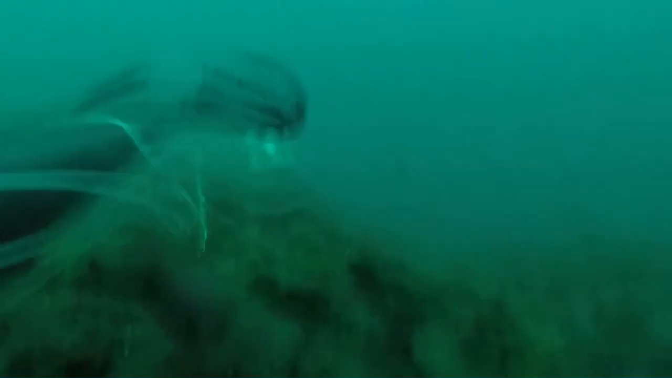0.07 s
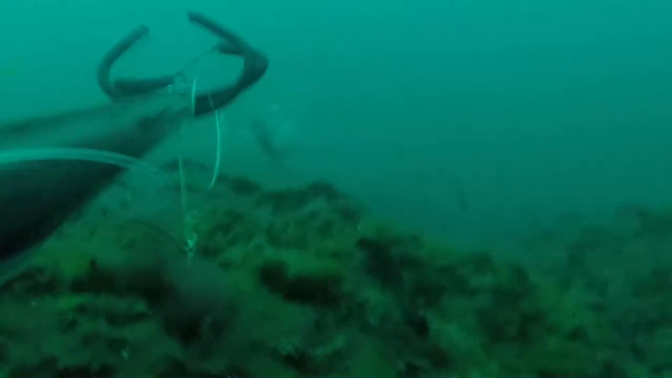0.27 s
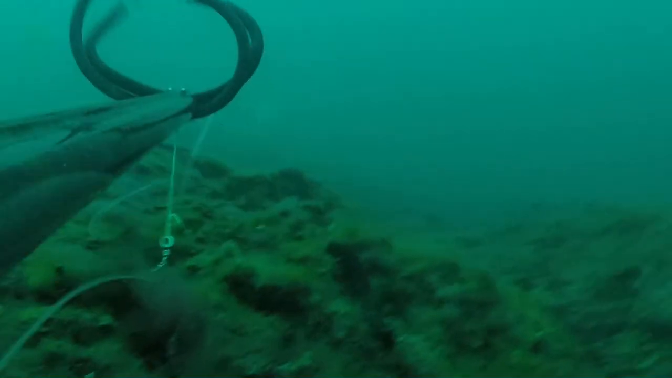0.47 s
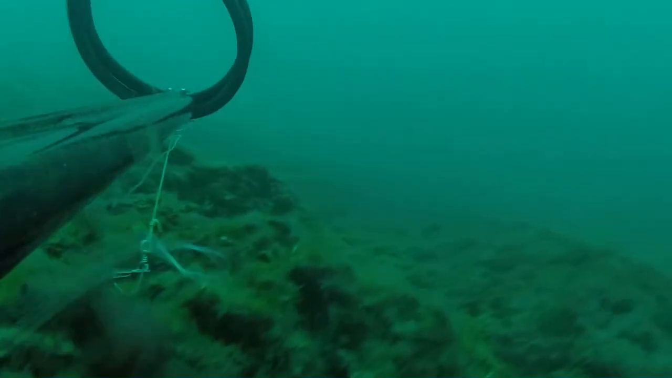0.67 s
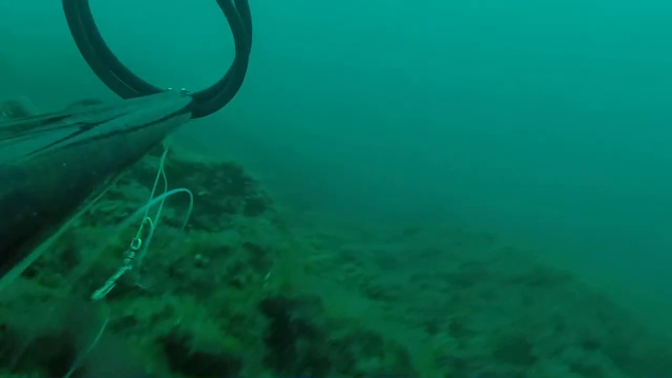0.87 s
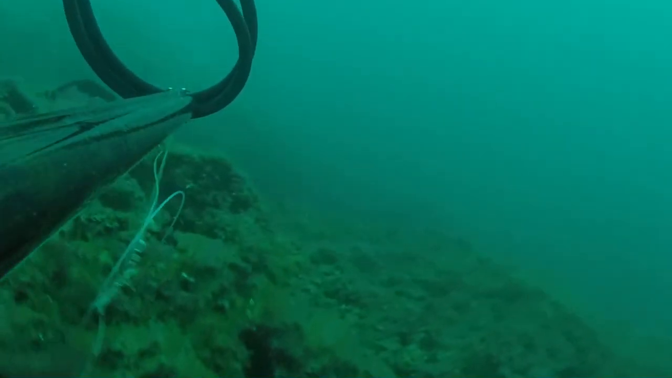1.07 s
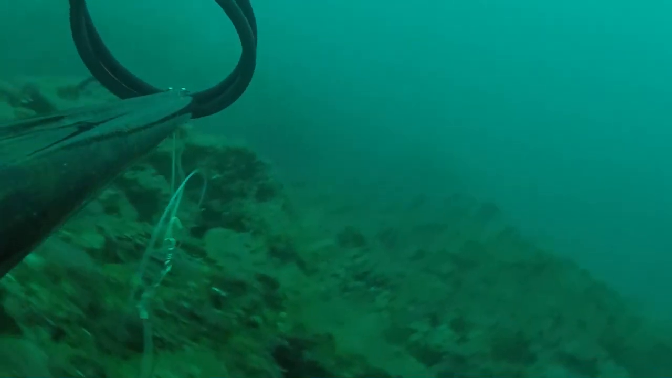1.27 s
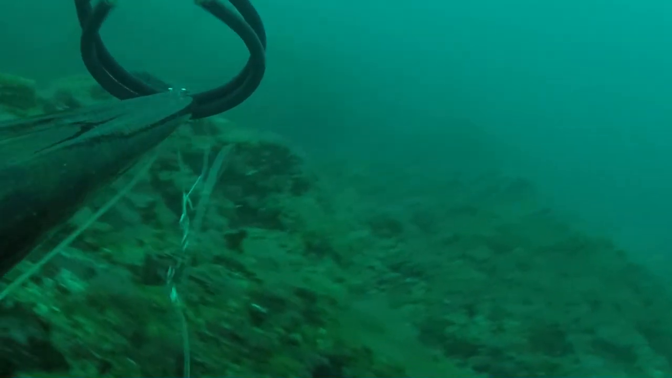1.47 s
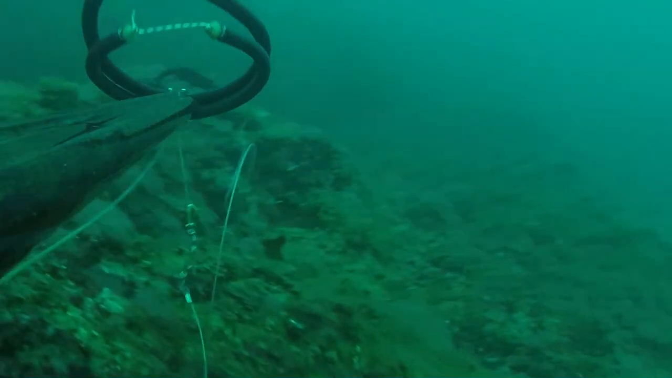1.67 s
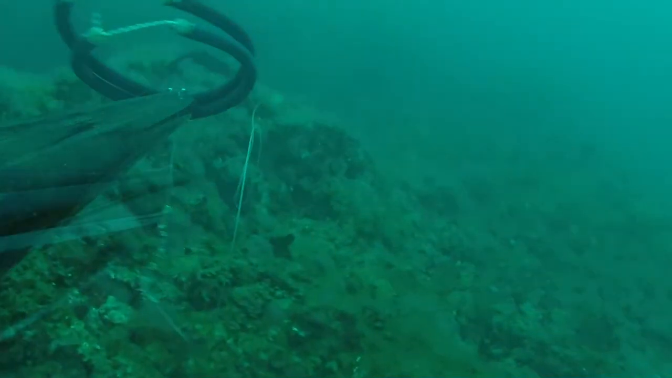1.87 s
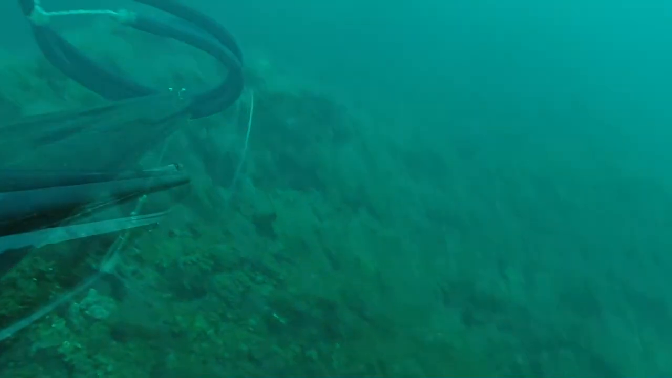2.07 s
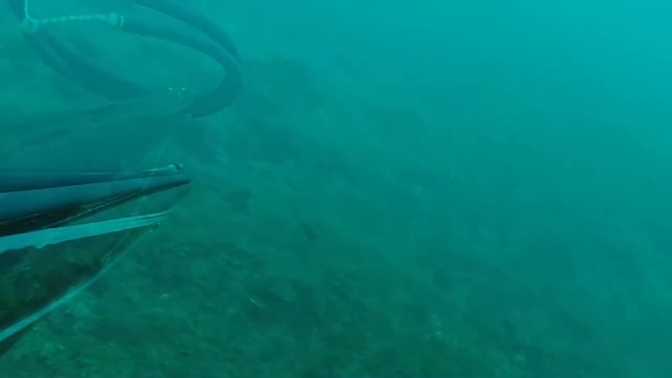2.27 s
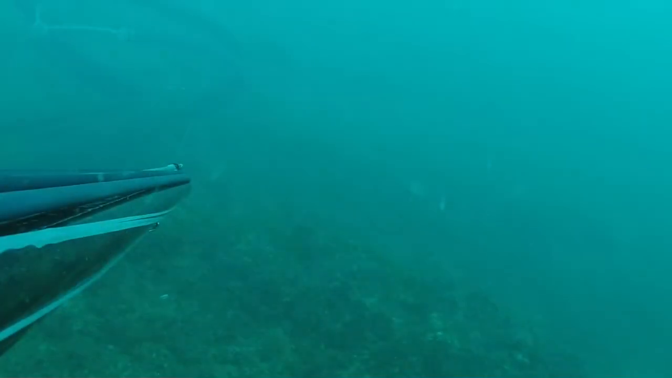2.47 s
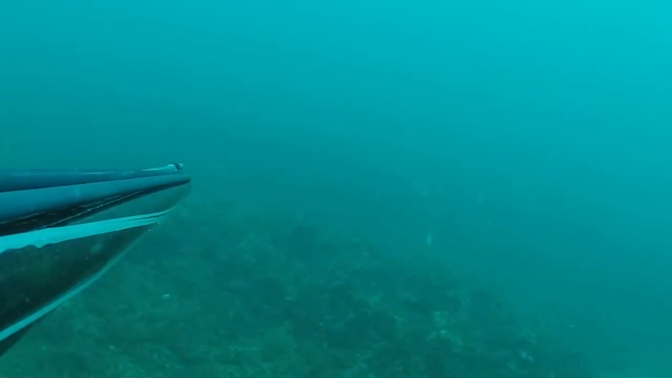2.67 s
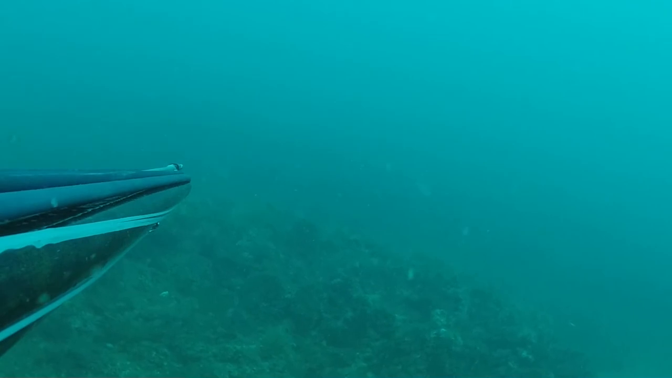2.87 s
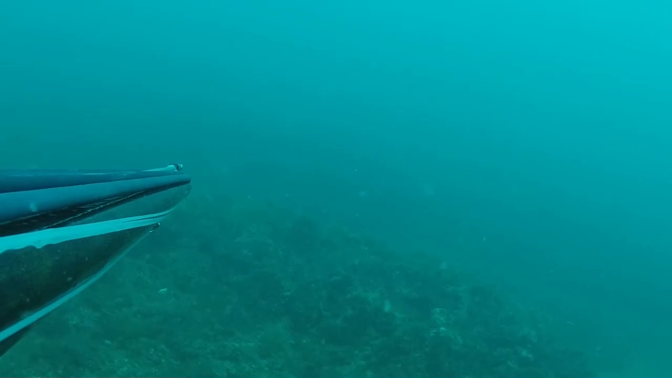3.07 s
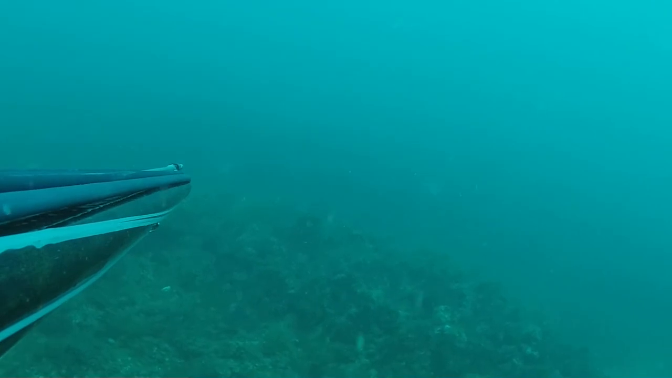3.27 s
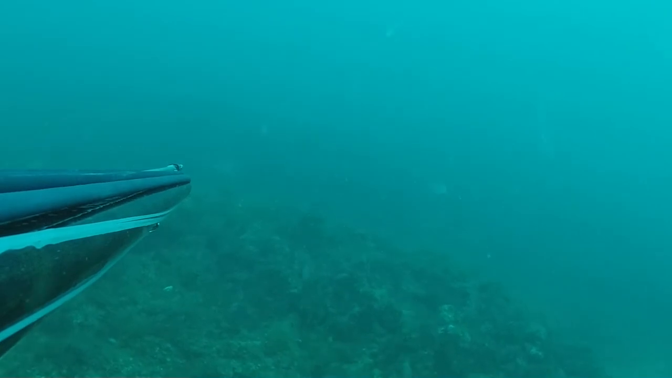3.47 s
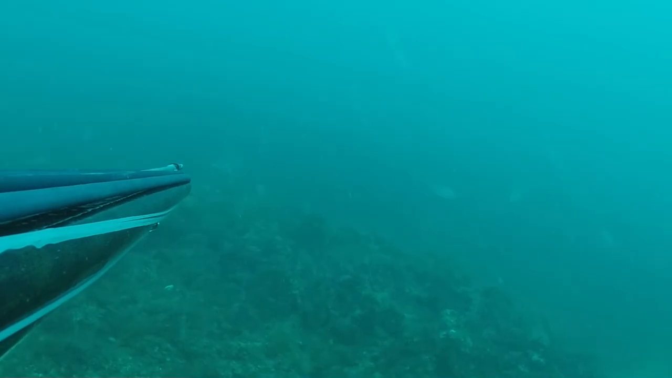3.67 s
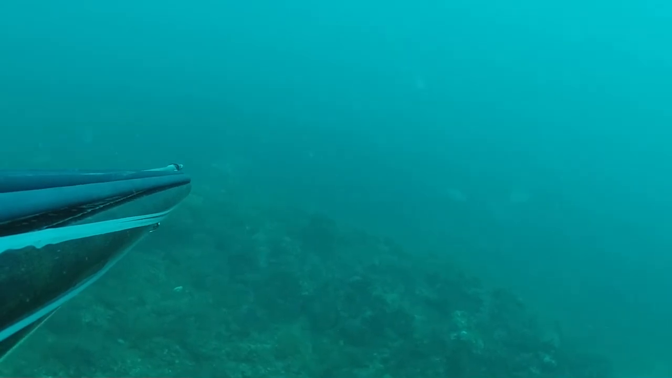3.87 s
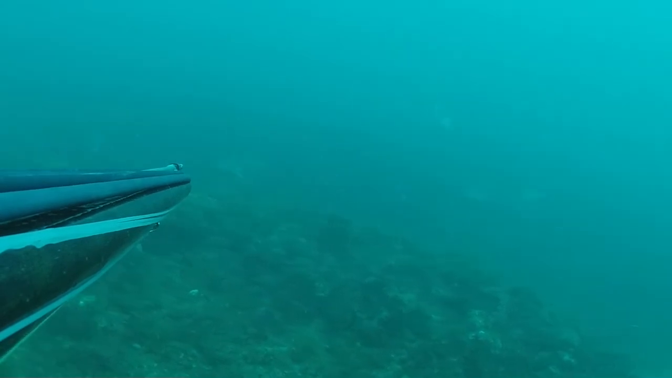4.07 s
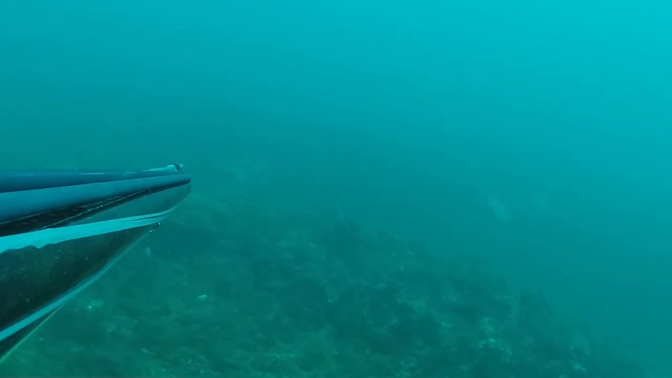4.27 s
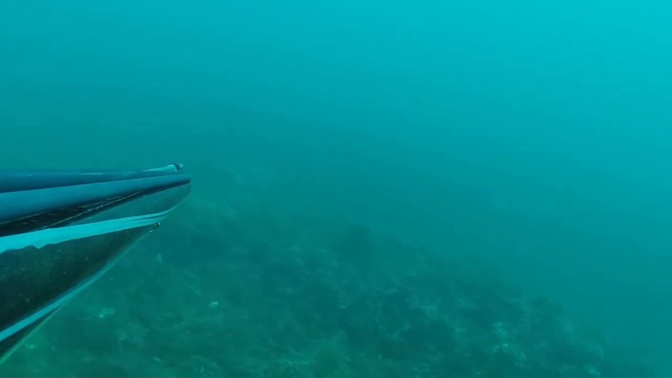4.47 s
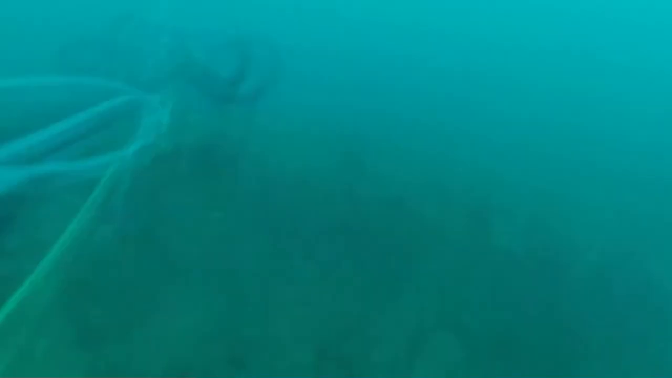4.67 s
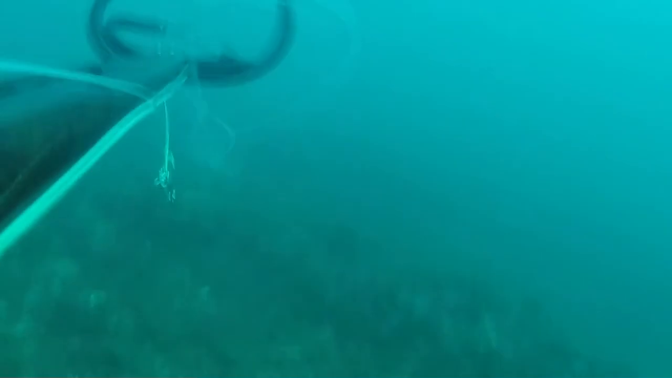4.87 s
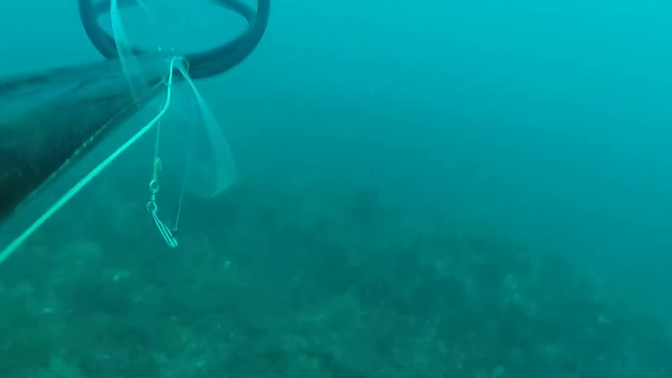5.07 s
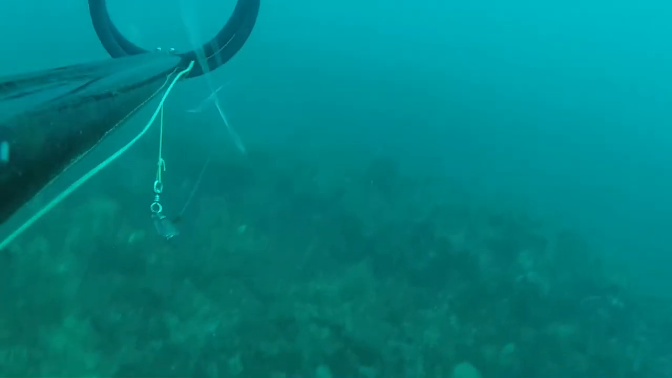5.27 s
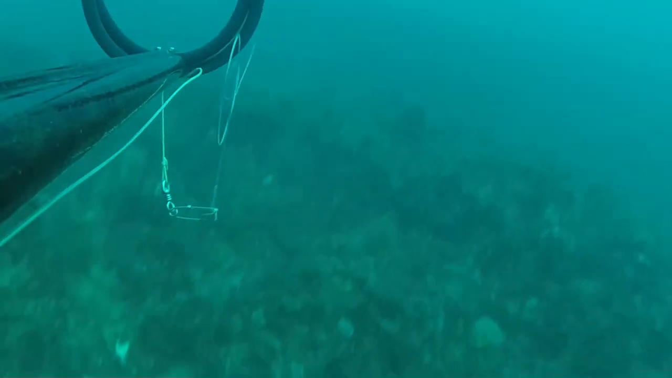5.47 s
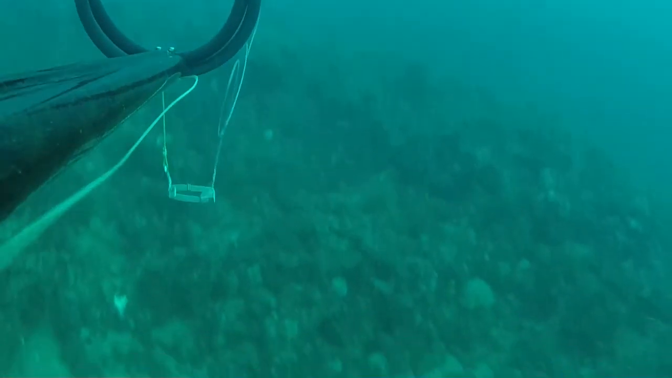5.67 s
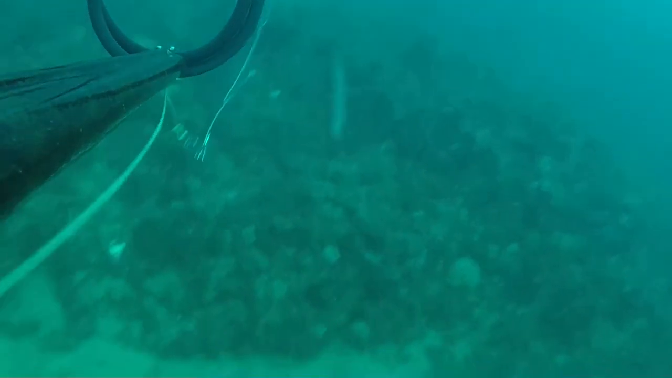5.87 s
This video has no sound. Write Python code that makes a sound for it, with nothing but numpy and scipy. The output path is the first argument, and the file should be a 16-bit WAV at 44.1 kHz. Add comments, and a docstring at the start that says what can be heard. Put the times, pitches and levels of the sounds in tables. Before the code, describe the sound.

Two abrupt, very loud mechanical cracks of a spear gun under water, each with a brief rattle, over a very quiet sea rumble and hiss.

```python
"""Spear gun fired twice under water

A camera in a sealed housing rides on a rubber-powered spear gun. Each shot is a rattle of noise scrapes
ringing barrel and housing modes, dull thumps and a slow sine shudder. Grainy friction makes line and rubbers
rustle; a rising tone is a squeaking bubble, fading sines are gulps and small bubbles. Far creatures snap in
bursts of bright noise, and filtered noise makes the sea rumble and hiss in the housing's resonances."""
import sys
import numpy as np
from scipy.fft import rfft, irfft, next_fast_len
from scipy.io import wavfile
from scipy.ndimage import map_coordinates

SR = 44100
rng = np.random.default_rng(int(sys.argv[2]) if len(sys.argv) > 2 else 0)


def int16_out(signal):
    """Quantize to a 16-bit WAV file."""
    q = np.round(np.clip(np.atleast_2d(signal).T, -1, 1) * 32767)
    wavfile.write(sys.argv[1], SR, q.astype(np.int16))


N = 261513  # length in samples

# Sea rumble and hiss spectra: freq_hz, relative density_db (per Hz)
RUMBLE_SPECTRUM = [(12, -29.5), (20, 3), (75, -4), (206, -6.5), (755, -13.5), (1500, -24.5), (3300, -120)]
HISS_SPECTRUM = [(600, -30.5), (1100, -14.5), (1510, -15.5), (2040, -11), (2400, -17), (3510, -10.5),
                 (4990, -22.5), (6000, -15.5), (6900, -18), (8600, -27), (9100, -22), (11800, -15),
                 (12400, -16), (14900, -24), (15500, -51)]
RUMBLE_DB, HISS_DB = -58.5, -57  # usual rms levels
# The background level dips at a shot, holds, then recovers: start_s, hold_end_s, depth_db
BACKGROUND_DIPS = [(0.334, 1.037, 12), (4.88, 5.461, 11)]
RECOVERY_DB_PER_S = 29.5
# The background level rises once, then drops back: start_s, top_s, end_s, rise_db
BACKGROUND_RISE = (1.3, 2.3, 2.65, 3)
# Water churned by a shot, heard as extra rumble: start_s, level_db
WASHES = [(.335, -35.5), (4.879, -33.5)]
WASH_FADE_DB_PER_S = 154
# Far creatures snapping: time_s, peak_db, center_hz
SNAPS = [(1.9965, -33.5, 6100), (2.245, -36, 6000), (2.2606, -21.5, 6030), (3.148, -38, 3410),
         (3.464, -38, 6870), (3.591, -33, 3350), (3.6325, -34.5, 6760), (3.8854, -29, 6930),
         (3.9114, -38, 7260), (4.78, -30, 5900), (4.8, -38, 5900), (5.004, -33, 7470), (5.495, -50, 5730),
         (5.742, -50, 7000)]

# Strokes of line and rubbers, one list per dragged part:
# start_s, top_s, dull_level_db at the top, bright_over_dull_db, fade_db_per_s
RUSTLE_STROKES = [
    [(.295, .315, -44, -15.5, 799), (.335, .352, -30.5, -7, 170.5), (.42, .52, -55, -5, 51),
     (.895, .91, -50, -24, 248.5)],
    [(1.6, 1.87, -54.5, -8, 41), (2.19, 2.31, -55, -10, 92), (2.24, 2.595, -50, -7.5, 2500)],
    [(4.855, 4.875, -24, -13, 2999.5), (4.88, 4.905, -22.5, -7, 452.5), (4.95, 4.99, -44, -9.5, 193),
     (5.03, 5.07, -43, -5.5, 144), (5.14, 5.24, -51.5, -3.5, 255.5), (5.2, 5.3, -59.5, -11.5, 31),
     (5.79, 5.91, -48.5, -3, 15)],
]
# Where each dragged part sounds most: center_hz, width_hz
DRAGGED_PARTS = [(1600, 2600), (1720, 900), (2150, 1500)]
SLIPS_PER_S, SLIP_SIZE = 90, 10  # sudden slips; extra size in ordinary grains
CLUMP_DB = 1.3  # the slowest of three layers of uneven bunching

# Contacts on the gear: time_s, body_db (for modes right at the pitch), pitch_oct (octaves above 1 kHz),
# crack_over_body_db, swell_ms (time scale of the scrape)
KNOCKS = [(0.302, -29.5, 1.4, -23, 7), (0.3354, 3, 1.5, -8.5, 1.75), (0.344, -4.5, 1.6, -2.5, 1.3),
          (0.356, -16.5, 1.2, -17, 2.5), (0.3664, -9.5, 0.96, -12, 2.4), (0.372, -15, 1.1, -12, 2.1),
          (0.3804, -2, 0.29, -27, 1.5), (0.388, -22.5, 1.8, 2.5, 2.7), (0.4053, -18.5, 1.28, -16, 1.5),
          (0.4454, -16, 2.1, -7, 1.3), (0.456, -27, 1.8, -16, 0.87), (0.4756, -24.5, 1.55, -4.5, 1.1),
          (0.899, -27, 1.37, -11, 1.5), (0.924, -12.5, 1.59, 7.5, 1.83), (0.93, -19, 1.86, 6.5, 1.1),
          (0.9356, -10.5, 1.55, 5, 1.84), (0.944, -13, 1.7, 4.5, 1.22), (0.954, -31, 1.55, -5, 1.3),
          (1.165, -41, 1.55, -4.5, 1.9), (1.302, -43, 1.5, -1, 6), (1.344, -41, 1.35, 3, 1.9),
          (1.429, -43.5, 1.6, 4, 2.3), (2.212, -41.5, 0.8, 2, 3), (2.314, -36, 1.5, -4.5, 5.3),
          (2.332, -32.5, 1.3, -7, 0.95), (2.401, -35.5, 1.3, -0.5, 2), (2.505, -41.5, 1.8, 7, 0.88),
          (2.528, -43, 1.5, 10.5, 0.76), (2.567, -34, 1.2, -9, 8), (4.843, -27, 1.45, -12, 4.6),
          (4.882, 0.8, 1.29, -8.5, 2.4), (4.892, -9.5, 1.64, 0.5, 0.6), (4.905, -14, 0.48, -13, 3.7),
          (4.9114, -6.5, .6, -10, 2.8), (4.9206, -2.8, 0.38, -11, 1.7), (4.9267, -11, 1.9, 8.5, 0.45),
          (4.9293, 2, 0.32, -28, 0.98), (4.953, -25, 0.34, 4.5, 1.1), (4.979, -21, 1.1, -3, 1.3),
          (5.034, -24.5, 1.8, 14.5, 0.66), (5.037, -25, 0.32, -8, 2.1)]
# Barrel and housing, four groups of modes, the last for the crack: center_hz, width_hz
BODY_MODES = [
    [(1350, 600)],
    [(2050, 1000)],
    [(3550, 1100)],
    [(5500, 1200), (6900, 2000), (8800, 1700), (12500, 2500)],
]
LOSS_DB_PER_OCT = 12.5  # for mode groups away from the knock's pitch

# Jolts of the barrel: time_s, thump_peak_db
JOLTS = [(.334, -18), (.372, -27.5), (4.881, -17.5), (4.92, -21.5)]
# Low modes of the barrel: center_hz, width_hz
THUMP_MODES = [(150, 170), (320, 410)]
KICK_HZ = 84  # the housing's lowest mode
# Shudders of the mount: time_s, start_level_db
SHUDDERS = [(0.3608, -35), (4.904, -34)]
SHUDDER_HZ = 24.9
# Trapped air gulps and small bubbles: time_s, start_level_db, start_pitch_hz
GULPS = [(0.925, -53.5, 153.4), (.93, -46.5, 372), (4.845, -38.5, 330), (4.959, -53, 392.5),
         (5.035, -36.5, 345), (5.063, -44, 323), (5.118, -47, 328), (5.37, -50.5, 329),
         (1.644, -33.5, 3380), (3.063, -33, 3360), (2.665, -44, 1950), (3.16, -45, 1950),
         (3.2, -43.5, 1910), (3.67, -44, 1950), (4.1, -42, 1900), (5.59, -46, 1900)]
GULP_CYCLES = 30  # starting-pitch cycles to fade 60 dB
GULP_PITCH_RISE = .4  # fraction the pitch gains over that time

# A shrinking bubble: start_s, loudest_s, end_s
SQUEAK_TIMES = (1.505, 1.58, 1.633)
SQUEAK_DB, START_DB, END_DB = -40, -15, -13  # rms at its loudest; both ends relative to that
SQUEAK_HZ, RISE_OCT_PER_S = 2257, 3.6  # first pitch and its climb

# The housing dulls the treble: freq_hz, gain_db
HOUSING_GAIN = [(8000, 1), (12000, -17), (15000, -10), (16200, -33)]
TOP_HZ = 16800  # band limit


def amp(db):
    """Decibels to gain."""
    return 10 ** (np.asarray(db) / 20)


def unit(x):
    """Scale to rms 1."""
    return x / np.sqrt(np.mean(x ** 2) + 1e-20)


def wobble(rate):
    """A smooth random curve through `rate` random knots a second."""
    knots = rng.standard_normal(int(N * rate / SR) + 4)
    return map_coordinates(knots, [np.arange(N) * rate / SR])


def filtered(x, response):
    """Filter x by a complex response of frequency, padded so that the tail does not wrap."""
    n = x.shape[-1]
    padded = next_fast_len(n + SR // 10)
    spectrum = rfft(x, padded) * response(np.fft.rfftfreq(padded, 1 / SR))
    return irfft(spectrum, padded)[..., :n]


def shaped(points):
    """A gain curve through (freq_hz, gain_db) points on a log frequency axis."""
    freq_hz, gain_db = np.transpose(points)
    return lambda hz: amp(np.interp(np.log(hz + 1), np.log(freq_hz + 1), gain_db))


def modes(group):
    """Causal resonances, applied twice: once for the sounding source, once for the housing."""
    def response(f):
        total = 0
        for k, (center, width) in enumerate(group):
            resonance = 1j * f * width / (center ** 2 - f * f + 1j * f * width)
            total = total + (-1) ** k * resonance  # alternate signs between neighbours
        return total ** 2
    return response


def add(out, time_s, sound):
    """Mix a sound in at time_s, cut at the end of the scene."""
    part = out[round(time_s * SR):][:len(sound)]
    part += sound[:len(part)]


def fading(start_s, top_s, level_db, fade_db_per_s):
    """A gain that grows linearly from start to top, then fades steadily in dB."""
    t = np.arange(N) / SR
    grow = np.interp(t, [start_s, top_s], [0, 1])
    return grow * amp(level_db - fade_db_per_s * np.maximum(t - top_s, 0))


def background_level():
    """The background level in dB around its usual: dipping after each shot, raised once."""
    t = np.arange(N) / SR
    *times, rise_db = BACKGROUND_RISE
    level_db = np.interp(t, times, [0, rise_db, 0])
    for start_s, hold_end_s, depth_db in BACKGROUND_DIPS:
        left_db = depth_db - RECOVERY_DB_PER_S * np.maximum(t - hold_end_s, 0)
        level_db = level_db - (t > start_s) * np.maximum(left_db, 0)
    return level_db


def snap(center_hz):
    """A collapsing cavity: a few cycles of bright noise, peak 1."""
    t = np.arange(SR // 200) / SR
    decaying = amp(-60 * t / 0.004) * rng.standard_normal(len(t))
    burst = filtered(decaying, modes([(center_hz, 1.13 * center_hz), (11000, 7000)]))
    return burst / np.abs(burst).max()


def sea():
    """Rumble and hiss drift in level; faint crackle is part of the hiss, the nearest snaps stand out."""
    background_db = background_level()
    churn = amp(RUMBLE_DB + background_db)
    for start_s, level_db in WASHES:
        churn = churn + fading(start_s, start_s + 0.01, level_db, WASH_FADE_DB_PER_S)
    rumble = unit(filtered(rng.standard_normal(N), shaped(RUMBLE_SPECTRUM)))

    crackle = (rng.random(N) < 70 / SR) * rng.uniform(-24, 24, N)  # about 70 clicks a second
    crackle = filtered(crackle, lambda hz: hz ** 2 / (hz ** 2 + 4000 ** 2))  # far snaps are thin in the bass
    hiss = unit(filtered(rng.standard_normal(N) + crackle, shaped(HISS_SPECTRUM)))
    flicker_db = .8 * wobble(12)

    out = churn * amp(0.4 * wobble(4.1)) * rumble
    out += amp(HISS_DB + background_db + flicker_db) * hiss
    for time_s, peak_db, center_hz in SNAPS:
        add(out, time_s - .0008, amp(peak_db) * snap(center_hz))
    return out


def rustle():
    """Friction comes in uneven grains that sound the dragged part and the upper modes of the gear."""
    out = np.zeros(N)
    slips = 1 + SLIP_SIZE * (rng.random(N) < SLIPS_PER_S / SR)
    bunching_db = CLUMP_DB * wobble(45) + 1.2 * wobble(70) + 1.8 * wobble(400)
    grains, fine = rng.standard_normal((2, N)) * slips * amp(bunching_db)
    bright = unit(filtered(fine, modes(BODY_MODES[-1])))
    for strokes, part in zip(RUSTLE_STROKES, DRAGGED_PARTS):
        dragged = unit(filtered(grains, modes([part])) + .45 * filtered(grains, modes(BODY_MODES[2])))
        for start_s, top_s, level_db, bright_db, fade_db_per_s in strokes:
            stroke = fading(start_s, top_s, level_db, fade_db_per_s)
            out += stroke * (dragged + amp(bright_db) * bright)
    return out


def knocks():
    """A short noise scrape swells, dies and rings body modes near its pitch; its crack rings the top group."""
    out, t = np.zeros(N), np.arange(SR // 25) / SR
    group_oct = np.log2([group[0][0] / 1000 for group in BODY_MODES[:-1]])
    for time_s, body_db, pitch_oct, crack_db, swell_ms in KNOCKS:
        u = t / (swell_ms / 1000)
        envelope = u ** 1.1 * np.exp(-.55 * u ** 1.59)
        scrapes = envelope * rng.standard_normal((len(BODY_MODES), len(t)))
        loss_db = LOSS_DB_PER_OCT * np.abs(group_oct - pitch_oct)
        group_db = body_db + np.append(-loss_db, crack_db)
        for scrape, group, gain in zip(scrapes, BODY_MODES, amp(group_db)):
            ring = filtered(scrape, modes(group))
            add(out, time_s - .0003, gain * ring / np.abs(ring).max())
    return out


def recoil():
    """Released rubbers jolt the barrel into dull thumps; the mount shudders for a second; air gulps."""
    out, t = np.zeros(N), np.arange(SR) / SR
    for time_s, peak_db in JOLTS:
        thump = filtered(amp(-60 * t / 0.06) * rng.standard_normal(SR), modes(THUMP_MODES))
        thump /= np.abs(thump).max()
        kick = .8 * amp(-60 * t / 0.081) * np.sin(2 * np.pi * KICK_HZ * t)
        add(out, time_s, amp(peak_db) * (kick + thump))
    for time_s, level_db in SHUDDERS:
        add(out, time_s, amp(level_db - 60 * t / 1.6) * np.sin(2 * np.pi * SHUDDER_HZ * t))
    for time_s, level_db, pitch_hz in GULPS:
        age = t * pitch_hz / GULP_CYCLES  # 1 when faded by 60 dB
        envelope = amp(level_db - 60 * age) * (1 - np.exp(-t / 0.0007))
        # half the rise in the phase gives the full rise in pitch
        phase = 2 * np.pi * pitch_hz * t * (1 + GULP_PITCH_RISE / 2 * age)
        add(out, time_s, envelope * np.sin(phase))
    return out


def squeak():
    """One slightly unsteady tone that rises as the bubble shrinks."""
    start_s, _, end_s = SQUEAK_TIMES
    t = np.arange(N) / SR
    pitch_hz = SQUEAK_HZ * 2 ** (RISE_OCT_PER_S * np.clip(t - start_s, 0, end_s - start_s))
    level_db = SQUEAK_DB + np.interp(t, SQUEAK_TIMES, [START_DB, 0, END_DB]) + 2.5 * wobble(60)
    phase = 2 * np.pi * np.cumsum(pitch_hz * (1 + 0.011 * wobble(140))) / SR
    gate = np.interp(t, [start_s - .005, start_s, end_s, end_s + .005], [0, 1, 1, 0])
    return gate * np.sqrt(2) * amp(level_db) * np.sin(phase)  # root 2: level is rms


def scene():
    """Everything reaches one microphone through the housing."""
    mix = sea() + rustle() + knocks() + recoil() + squeak()
    return mix[None]  # one channel


def record(dry):
    """The treble is dulled, peaks flatten softly near full scale, nothing is kept above the band limit."""
    dulled = filtered(dry, shaped(HOUSING_GAIN))
    held = dulled / (1 + np.abs(dulled / .97) ** 6) ** (1 / 6)
    return filtered(held, lambda hz: hz < TOP_HZ)


dry = scene()
out = record(dry)
int16_out(out)
```